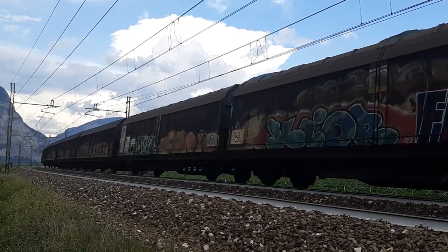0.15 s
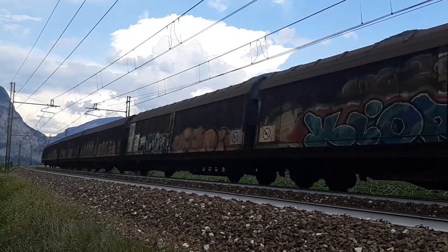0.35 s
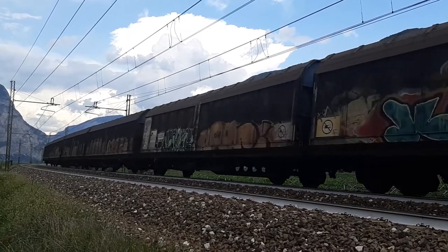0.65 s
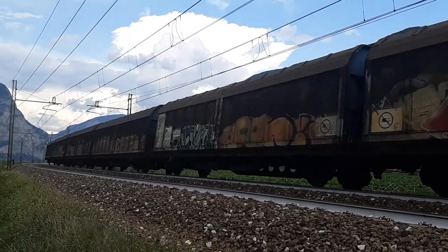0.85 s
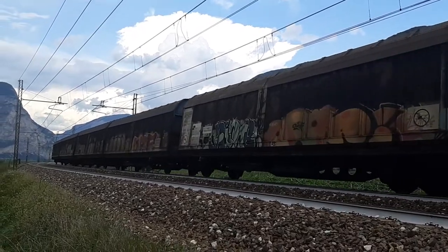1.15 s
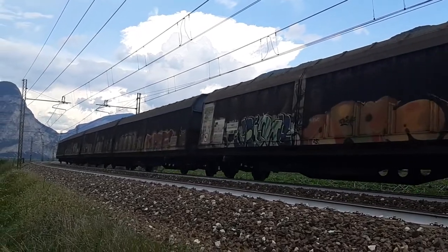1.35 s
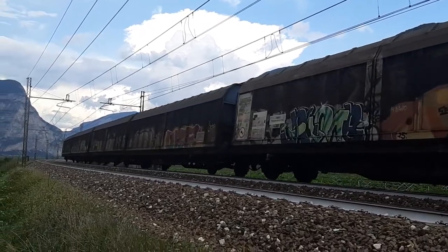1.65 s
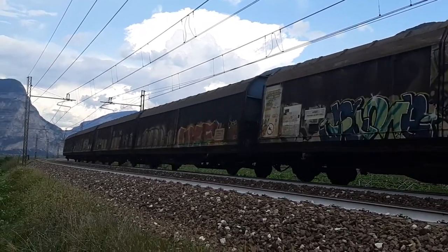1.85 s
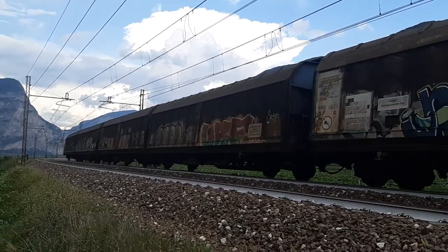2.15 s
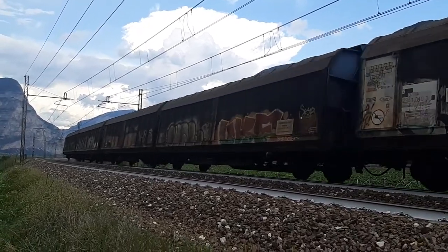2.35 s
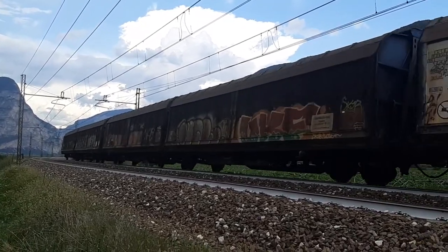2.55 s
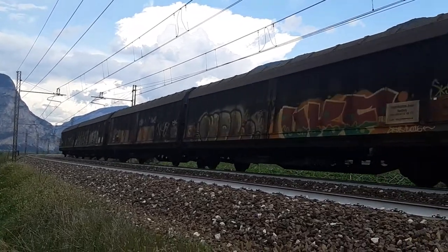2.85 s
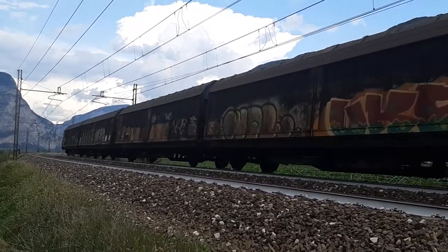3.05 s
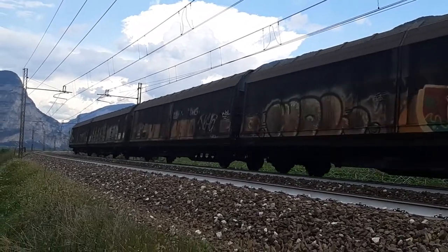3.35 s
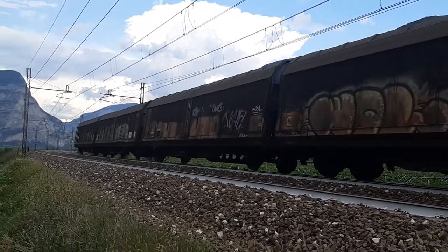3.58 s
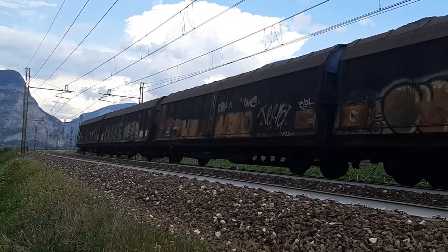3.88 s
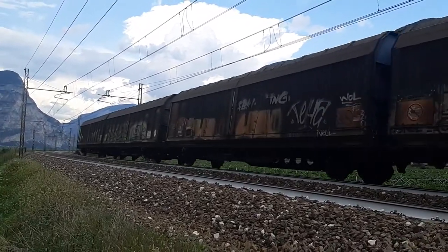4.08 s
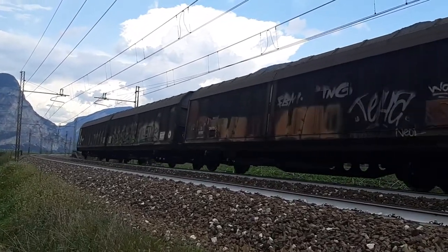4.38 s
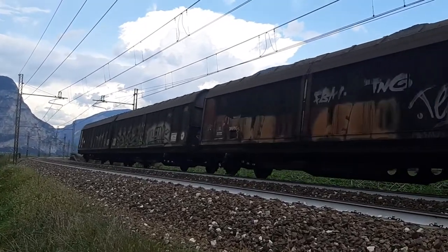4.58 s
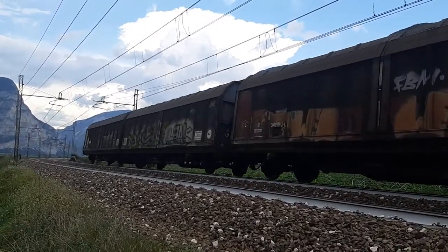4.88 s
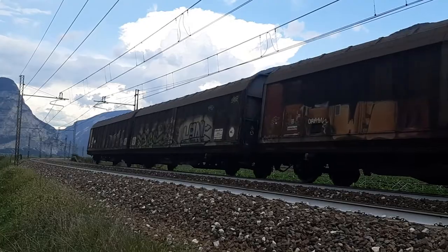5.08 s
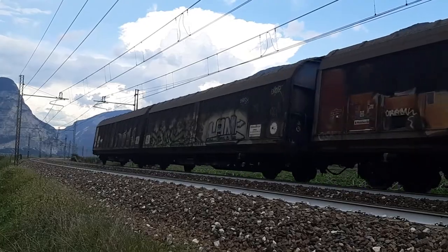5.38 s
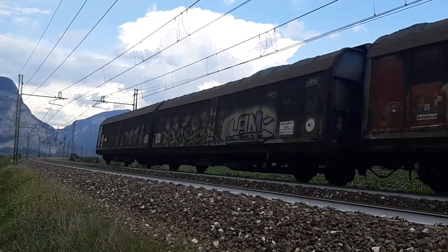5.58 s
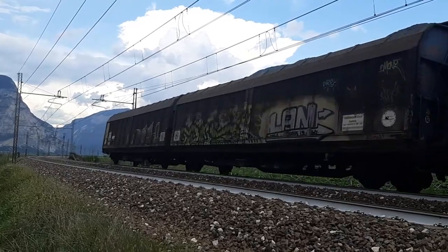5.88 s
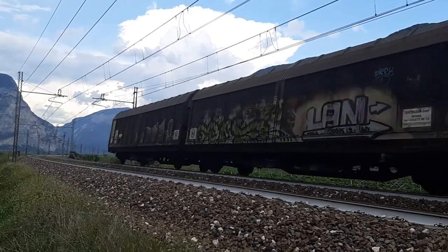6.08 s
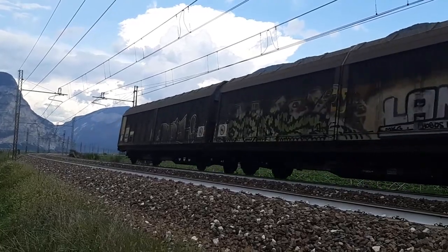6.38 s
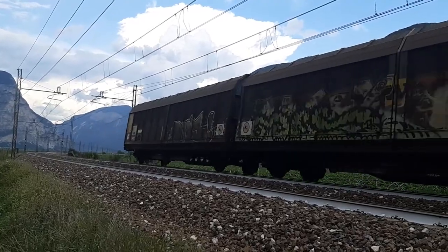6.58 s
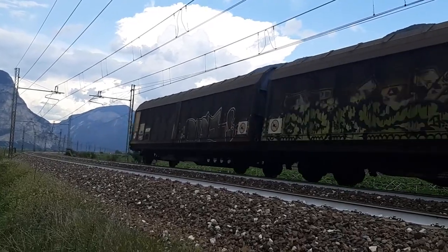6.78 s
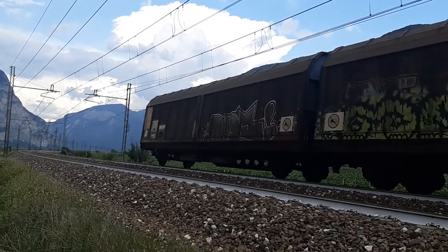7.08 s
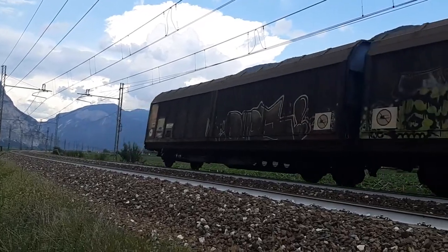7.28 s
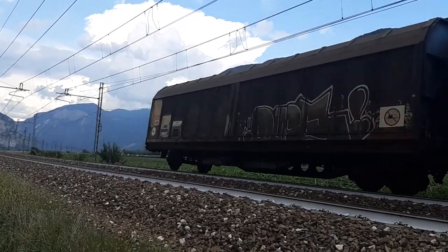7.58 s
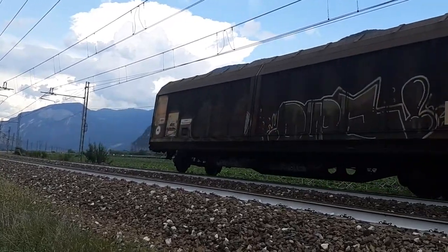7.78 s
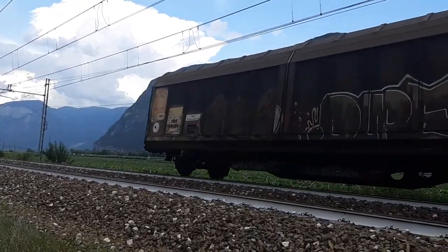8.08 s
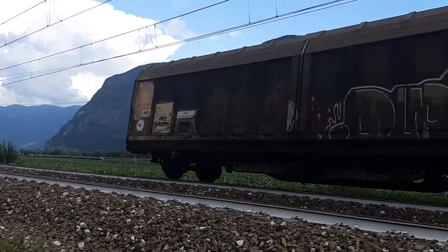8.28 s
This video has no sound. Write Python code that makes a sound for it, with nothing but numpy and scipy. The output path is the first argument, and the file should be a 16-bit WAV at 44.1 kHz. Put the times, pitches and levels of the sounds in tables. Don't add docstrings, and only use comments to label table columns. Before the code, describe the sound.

Steady rolling rumble of goods wagons, with a harsh multi-toned wheel screech erupting after two seconds, wavering for about three, then dying into rumble.

```python
import sys
import numpy as np
from scipy import signal
from scipy.fft import rfft, irfft, next_fast_len
from scipy.io import wavfile

SR = 44100
rng = np.random.default_rng(int(sys.argv[2]) if len(sys.argv) > 2 else 0)


def level_to_linear(level):
    exponent = np.asarray(level, float) / 20
    return 10 ** exponent


def wav_record(signal):
    frames = np.transpose(np.atleast_2d(signal))
    bounded = np.clip(frames, -1, 1)
    quanta = np.round(bounded * 32767).astype(np.int16)
    wavfile.write(sys.argv[1], SR, quanta)


N = 371763
T = np.arange(N) / SR
STEP = 32
SPEED, DISTANCE, ABREAST_S = 8.84, 11.5, 3.55
CATCH_S = 2.117


def in_time(rows):
    s, *columns = np.transpose(rows)
    return [np.interp(T, s, c) for c in columns]


def at_hz(points, hz):
    points = np.array(points)
    return np.interp(np.log(hz), np.log(points[:, 0]), points[:, 1])


def tent(s, half):
    return np.clip(1 - np.abs(T - s) / half, 0, 1)


def drift(rate_hz, order=2, count=N):
    settle = 2000
    r = np.exp(-2 * np.pi * rate_hz * STEP / SR)
    slow = rng.standard_normal(count // STEP + settle + 2)
    for _ in range(order):
        slow = signal.lfilter([1 - r], [1, -r], slow)
    slow = slow / slow.std()
    return np.interp(np.arange(count) / STEP, np.arange(len(slow) - settle), slow[settle:])


def mode(cycles, width_hz, steady):
    steady = np.clip(steady, 0, .93)
    shake = np.sqrt(1 - steady ** 2)
    along = shake * drift(width_hz / 2, order=1, count=len(cycles))
    across = shake * drift(width_hz / 2, order=1, count=len(cycles))
    phase = 2 * np.pi * cycles
    return (np.sqrt(2) * steady + along) * np.cos(phase) + across * np.sin(phase)


def heard_time():
    along = SPEED * (T - ABREAST_S)
    toward = along / np.hypot(along, DISTANCE)
    return np.cumsum(1 - SPEED / 343 * toward) / SR


# frequency in Hz, left-right difference in dB.
SHADE_LOSS = [(150, 18), (380, 9.5), (700, 15), (1290, 25.5), (2380, 39.5), (4400, 88), (6000, 84),
              (8500, 114), (11000, 90), (13000, 49), (14500, 51), (15500, 53)]


def ports(left, hz, shade):
    return np.array([left, left * level_to_linear(-shade * at_hz(SHADE_LOSS, hz))])


# frequency in Hz, left-right likeness from 0 to 1.
COHERENCE = [(60, .96), (200, .95), (400, .93), (700, .82), (1200, .6), (2500, .35), (15000, .3)]


def bands(low_hz, high_hz, white):
    edges = low_hz * 1.2225 ** np.arange(np.log(high_hz / low_hz) / np.log(1.2225))
    for k, (low, high) in enumerate(zip(edges, edges[1:])):
        band = signal.butter(3, [low, high], "band", fs=SR, output="sos")
        near, other = signal.sosfilt(band, white[k % 2])
        hz = np.sqrt(low * high)
        alike = np.clip(at_hz(COHERENCE, hz), 0, 1)
        left = np.roll(near, min(15, round(.5 * SR / (2 * np.pi * hz))))
        right = alike * near + np.sqrt(1 - alike ** 2) * other
        yield hz, np.array([left, right]) * np.sqrt(SR / 2)


# time in seconds, rumble in dB before gain control.
WAGON_LOAD = [(0, -34.5), (.91, -32.5), (1.17, -34), (1.85, -31.5), (2.9, -30.5), (3.26, -31), (3.8, -27.5),
              (4.46, -31.5), (4.7, -26), (5.56, -25.5), (6.01, -36.5), (6.4, -33), (7.32, -31), (8.43, -30)]
# time in seconds, gain in dB.
DUCKING_GAIN = [
    (1.9, 5),
    (2.9, -7),
    (6.0, -5.5),
    (7.3, -1.5),
    (8.43, -4),
]
# time in seconds, left-right difference in dB.
RUMBLE_PAN = [
    (3.26, -11),
    (3.8, 1.5),
]
# frequency in Hz, level in dB per Hz.
RUMBLE_SPECTRUM = [(15, -58), (25, -69), (43, -63.5), (78, -3.5), (97, -2.5), (162, -2), (251, -14),
                   (300, -35), (390, -70), (660, -120)]
# frequency in Hz, level in dB per Hz.
BODY_SPECTRUM = [(150, -11), (250, 1), (400, -3.5), (600, -5.5), (900, -11), (1300, -14.5)]
# time in seconds, lift below 80 Hz in dB.
DEEP_BASS = [
    (0, 2.5),
    (5.8, 8.5),
    (6.3, -15),
]


def rolling(shade):
    (load_db,), (duck_db,), (pan_db,) = in_time(WAGON_LOAD), in_time(DUCKING_GAIN), in_time(RUMBLE_PAN)
    (deep_db,) = in_time(DEEP_BASS)
    rumble_db, body_db = load_db + duck_db, -38.5 + duck_db
    out, swell = 0, drift(6.1)
    for hz, noise in bands(27.33, 1700, rng.standard_normal((2, 2, N))):
        lean_db = pan_db + 7.4 * shade * np.log2(hz / 110)
        sides_db = np.array([lean_db, -lean_db]) / 2
        rumble = level_to_linear(rumble_db - 22 + at_hz(RUMBLE_SPECTRUM, hz) + deep_db * (hz < 78) + sides_db)
        body = ports(level_to_linear(body_db - 22.5 + at_hz(BODY_SPECTRUM, hz)), hz, shade)
        out = out + noise * np.hypot(rumble, body) * level_to_linear(.5 * swell + 1.57 * drift(6.6))
    return out


# start in seconds, length in seconds, hiss drop in dB.
BLOCK_RELEASES = [
    (5.942, 0.13, 6),
    (6.892, .845, 4),
]


def releases():
    drop_db = np.zeros(N)
    for s, length, depth_db in BLOCK_RELEASES:
        edge_s = 0.014
        drop_db += depth_db * np.clip(np.minimum(T - s, s + length - T) / edge_s, 0, 1)
    return drop_db


def thicket(width_hz, peak_db, count):
    over = 4
    size = next_fast_len(N + SR)
    hz, read = np.arange(size // 2 + 1) * SR / size, heard_time() * SR * over
    out = rng.standard_normal(N)
    for centres in np.linspace(3200, 16000, count) + rng.uniform(-300, 300, (4, count)):
        comb = np.zeros(len(hz))
        comb[(centres * size / SR).astype(int)] = 1
        reach = hz[:4000] - hz[2000]
        shape = signal.fftconvolve(comb, 1 / (1 + (2 * reach / width_hz) ** 2), "same")
        spectrum = rfft(rng.standard_normal(size)) * np.sqrt(np.abs(shape))
        fine = irfft(spectrum, over * size) * over
        out = out + level_to_linear(peak_db + 5 * drift(3)) * np.interp(read, np.arange(over * size), fine)
    return out


# time in seconds, hiss lift in dB, decay length in seconds.
FLAT_SPOT = [
    (0.286, 5, 0.054),
    (0.611, 7, 0.029),
    (.93, 7, 0.045),
    (1.268, 5.5, 0.06),
    (1.572, 2.5, .05),
    (1.802, 6, 0.1),
    (1.903, 5, 0.029),
]
# frequency in Hz, level in dB per Hz.
HISS_SPECTRUM = [(700, -12.5), (1000, -6), (1600, -2.5), (2300, -1.5), (2800, 0), (4500, 2), (5500, 3),
                 (7000, 0.5), (9000, 6), (11000, 4), (13000, 6.5), (16000, 12)]


def hiss(hiss_db, growl_db, valley_db, top_db, shade):
    lift_db = np.zeros(N)
    for s, bump_db, length in FLAT_SPOT:
        lift_db += bump_db * np.exp(-np.maximum(T - s, 0) / length) * (T > s)
    out, flutter, release_db = 0, drift(5.6), releases()
    steel = thicket(22, peak_db=np.where(T > CATCH_S, 0, -4) - release_db, count=22)
    white = np.array([[steel, rng.standard_normal(N)]] * 2)
    colour_hz = np.log([2400, 2800, 5400, 6300, 10000, 12500])
    for hz, noise in bands(635.8, 17000, white):
        growl = np.interp(np.log(hz), colour_hz, [0.66, 0.046, 0.023, 0.29, 0.59, 0.8])
        valley = np.interp(np.log(hz), colour_hz, [0.053, 0.0092, 0.035, 0.85, 1, 0.029])
        top = np.interp(np.log(hz), colour_hz, [0.12, 0.013, 0.16, 0.018, 0.38, 0.92])
        patchy_db = .8 * flutter + drift(9)
        colour_db = growl * (growl_db + 8.5) + valley * (valley_db + 5) + top * (top_db - 9.5)
        colour_db += -6.5 * np.clip(np.log2(hz / 3500), -.3, .6) * (T < CATCH_S)
        colour_db -= 1.5 * np.clip(T - ABREAST_S, 0, 3.0) * (hz > 14000)
        colour_db -= 1.4 * release_db * np.exp(-(np.log2(hz / 2650) / 0.15) ** 2)
        level_db = hiss_db - 32.0 + at_hz(HISS_SPECTRUM, hz) + colour_db + lift_db + patchy_db
        out = out + noise * level_to_linear(level_db) * ports(np.ones(N), hz, shade)
    return out


# start in seconds, length
# in # seconds, frequency in Hz, level in dB.
SHORT_SQUEAKS = [(.09, 0.09, 7830, -45), (.295, 0.026, 8150, -31), (0.384, 0.12, 10540, -45),
                 (0.436, 0.07, 8500, -42), (0.447, 0.053, 3110, -38.5), (0.613, 0.022, 8100, -36),
                 (0.652, 0.057, 3050, -35), (0.934, .02, 8100, -38), (1.083, 0.018, 11000, -50),
                 (1.249, 0.03, 9850, -34), (1.252, 0.049, 8050, -38), (1.5, .06, 8300, -42.5),
                 (1.575, .03, 9800, -42), (1.576, .02, 8000, -37.5), (1.78, 0.037, 6050, -44),
                 (1.9, 0.041, 8060, -44), (2.002, 0.055, 2940, -33), (2.067, 0.054, 5920, -36),
                 (4.6, 0.052, 193, -26.5), (6.13, 0.27, 4300, -40), (6.6, 0.25, 4320, -44),
                 (7.8, .15, 4320, -46), (7.8, .22, 3030, -45), (0.457, .05, 10200, -46),
                 (1.35, .05, 12200, -47), (1.47, 0.044, 1400, -41), (4.35, .45, 1200, -41.5),
                 (4.382, 0.17, 3600, -26), (6.425, 0.27, 1090, -42), (6.71, 0.16, 1095, -47)]


def squeaks(shade):
    out = 0
    for s, length, hz, level_db in SHORT_SQUEAKS:
        rise = np.clip((T - s) / max(0.0016, .3 * (length - .1)), 0, 1)
        fall = np.clip((s + length - T) / (0.12 * length), 0, 1)
        ring = mode(hz * T, 25 + hz / 150, steady=.55)
        out = out + ports(level_to_linear(level_db) * rise * fall * ring, hz, shade)
    return out


# level in dB at -30 dB pressure, dB per dB of pressure,
# dB lost per dB of release.
MODE_LAWS = [
    (-30.5, 1.13, 1),
    (-35.5, 1.5, 5),
    (-44.5, 1, 0),
    (-29, 1.39, 0.4),
]
# peak in seconds, half length in seconds, lift in dB.
MODE_SURGES = [
    [(2.19, 0.092, 10), (2.72, 0.12, 9), (4.15, 0.27, -7.5), (5.45, 0.46, 3), (6.3, 0.47, -12),
     (7.1, 0.55, -4), (7.62, .1, 1.5), (8.2, .4, -0.5)],
    [(2.33, 0.24, 6), (2.78, 0.28, 11.5), (3.14, 0.11, 8), (4.03, 0.2, 8.5), (4.95, 0.18, -15),
     (5.48, 0.31, 14), (5.9, 0.12, 13), (8.06, .15, 13)],
    [(2.48, 0.44, 18.5), (3.25, .2, 11.5), (3.58, .1, 9), (4.63, .15, 9), (5.6, .06, 8), (7.9, .15, 12)],
    [(2.25, 0.25, -8), (2.45, 0.091, 4), (2.96, 0.059, 5), (3.3, 0.16, 11), (3.58, 0.17, 13.5),
     (3.9, 0.25, 7.5), (4.63, .15, 3.5), (5.1, 0.23, 4.5), (5.6, 0.29, 6), (5.9, 0.11, 6.5),
     (6.02, 0.074, -11), (7.3, 0.64, 5)],
]


def singing(pressure_db, release_db):
    for (base_db, follows, lets_go), surges in zip(MODE_LAWS, MODE_SURGES):
        surge_db = sum(lift_db * tent(s, half) for s, half, lift_db in surges)
        yield base_db + follows * (pressure_db + 30) - lets_go * release_db + surge_db


# rest frequency in Hz, width in Hz.
SINGING_MODES = [
    (5725, 45),
    (7721, 22),
    (8722, 18),
    (9700, 20),
]


def squeal(hiss_db, valley_db, singing_db, rubbing, shade):
    heard, out = heard_time(), 0
    for (hz, width), level_db in zip(SINGING_MODES, singing_db):
        steady = 0.54 + 0.2 * (level_db - hiss_db)
        bed_db = -5.5 if hz < 6000 else valley_db - 1
        above = np.sqrt(np.maximum(level_to_linear(level_db) ** 2 - level_to_linear(hiss_db + bed_db) ** 2, 0))
        skirt = 0.44 * mode(hz * heard, 210, steady=0)
        ring = mode(hz * heard, width, steady) + skirt
        out = out + ports(rubbing * level_to_linear(3.0) * above * ring, hz, shade)
    return out


# rest frequency in
# Hz, width in Hz.
DRIVEN_MODES = [(1280, 90), (2235, 150), (2700, 70), (3110, 35), (3540, 25), (3676, 25), (4400, 45),
                (4720, 200), (6725, 50), (8790, 25), (10657, 25), (11593, 40), (11984, 30), (12517, 50),
                (13430, 40), (13605, 30), (14185, 30), (14800, 40), (15436, 30), (10100, 250), (13050, 500)]
DRIVEN_DB = [-25, -12, -14, -18, -16.5, -16, -12, -8, -16, -25, -17, -16.5, -22, -20, -20, -17, -25, -30,
             -30, -16, -11]


def driven_rings(hiss_db, growl_db, rubbing, shade):
    heard, out = heard_time(), 0
    for (hz, width), level_db in zip(DRIVEN_MODES, DRIVEN_DB):
        drive_db = hiss_db + (growl_db + 8.5) * (hz < 2500)
        gain = rubbing * level_to_linear(drive_db + 6.5 + level_db + 2.33 * drift(10))
        out = out + ports(gain * mode(hz * heard, width, steady=0), hz, shade)
    return out


# start in seconds, length in seconds, rest frequency in Hz, level in dB.
SINGING_SPELLS = [(2.08, 0.45, 3685, -27), (2.1, 0.7, 6730, -24), (2.1, 1.12, 8790, -28),
                  (2.12, 0.72, 12518, -30), (2.16, 0.45, 10660, -29), (2.17, 1.77, 15436, -25),
                  (2.5, 0.8, 3676, -23), (2.68, 0.82, 14185, -31), (2.7, 0.55, 4400, -31),
                  (2.72, 1.05, 14807, -29), (2.73, 0.41, 3533, -27), (2.73, 0.73, 13609, -26),
                  (2.75, 1.02, 11591, -31), (2.9, 1.3, 12505, -30), (2.98, 1.3, 6725, -31),
                  (3.02, 0.95, 7795, -31), (3.17, 0.65, 10670, -29), (3.27, 0.7, 8794, -32),
                  (3.47, 0.41, 9765, -28), (3.8, 0.55, 4379, -26), (3.98, 0.32, 3677, -23),
                  (4.08, 0.6, 14690, -29), (4.14, 0.31, 15771, -32), (4.17, 0.51, 7866, -27),
                  (4.4, 0.35, 13450, -30), (4.97, 0.23, 7781, -33), (5.03, 0.47, 10647, -37),
                  (5.31, 0.53, 6734, -37), (6.17, 0.62, 14363, -43), (7.74, 0.24, 10668, -49)]


def spells(rubbing, shade):
    heard, out = heard_time(), np.zeros((2, N))
    for s, length, hz, level_db in SINGING_SPELLS:
        part = slice(round(s * SR), round((s + length) * SR))
        fade = np.clip(np.minimum(T[part] - s, s + length - T[part]) / 0.091, 0, 1)
        gain = rubbing[part] * fade * level_to_linear(level_db + 0.5 + 0.29 * drift(4.4, count=len(fade)))
        out[:, part] += ports(gain * mode(hz * heard[part], 20, steady=.55), hz, shade[part])
    return out


# time in seconds, level in dB.
BRAKE_PRESSURE = [(0, -39), (2.116, -41), (2.125, -33), (2.19, -24), (3.2, -25.5), (3.4, -27.5),
                  (3.68, -30.5), (3.9, -26.5), (4.6, -26.5), (4.99, -30), (5.45, -32.5), (5.62, -36.5),
                  (5.94, -40), (6.37, -41), (6.87, -41.5), (7.8, -44.5), (8.43, -46.5)]
# time in seconds, left-right difference in dB.
PORT_SHADING = [
    (0, 26),
    (1.9, 32.5),
    (2.2, 23),
    (3.2, 29.5),
    (4.65, 25),
    (5.37, 19),
    (6.0, 5),
    (8.43, 5.5),
]
# peak in seconds, half length in seconds, growl lift in dB, top lift in dB.
BLOCK_SCRAPES = [
    (.1, 0.45, -3, 6.5),
    (1.08, 0.48, -1.5, 6),
    (1.598, 0.22, 1, 6),
    (1.846, 0.086, 1.5, -1),
    (2.166, 0.09, 9.5, -1),
    (2.947, 0.45, -5.5, 10.5),
    (3.26, 0.11, -3.5, 2),
    (4.494, 0.32, 3.5, 2),
    (6.4, 0.26, 0.5, 7.5),
    (7.95, 0.33, 0.5, 7.5),
]
# dB at -40 dB pressure, dB per dB of pressure, dB per dB of release,
# dB once the block has bitten.
GROWL, VALLEY, TOP = (-3, -0.3862, -1.02, -2.5), (-15, 0.34, -.3, -1), (-7.5, 0, 2, 5)


def scene():
    (pressure_db,), (pan_db,), release_db = in_time(BRAKE_PRESSURE), in_time(PORT_SHADING), releases()
    bitten = T > CATCH_S
    growl_db, valley_db, top_db = (base + follows * (pressure_db + 40) + lets_go * release_db + after * bitten
                                   for base, follows, lets_go, after in (GROWL, VALLEY, TOP))
    for s, half, low_db, high_db in BLOCK_SCRAPES:
        growl_db = growl_db + low_db * tent(s, half)
        top_db = top_db + high_db * tent(s, half)
    hiss_db, shade = pressure_db - release_db, pan_db / 28
    rubbing = np.clip((T - CATCH_S) / .004, 0, 1)
    train = rolling(shade) + hiss(hiss_db, growl_db, valley_db, top_db, shade) + squeaks(shade)
    wheel = squeal(hiss_db, valley_db, singing(pressure_db, release_db), rubbing, shade)
    wheel = wheel + driven_rings(hiss_db, growl_db, rubbing, shade) + spells(rubbing, shade)
    return train + wheel


def band_limit(x):
    return signal.sosfilt(signal.butter(12, 16250, fs=SR, output="sos"), x)


def record(dry):
    low_pass = signal.ellip(12, .5, 70, 15700, fs=SR, output="sos")
    mix = np.clip(signal.sosfilt(low_pass, dry), -1, 1)
    return band_limit(mix)


dry = scene()
out = record(dry)
wav_record(out)
```